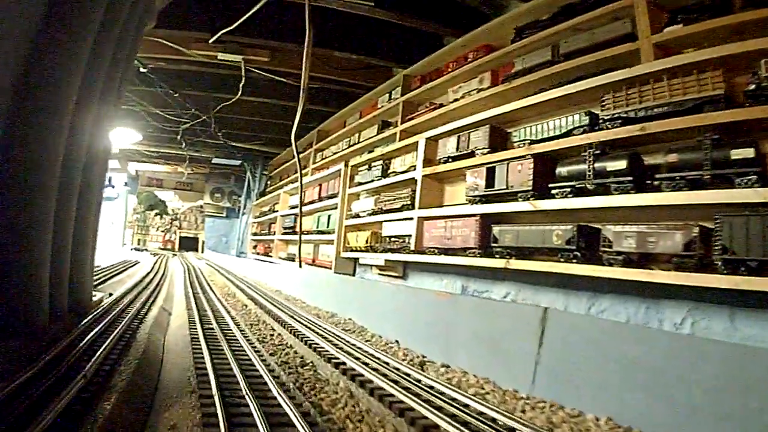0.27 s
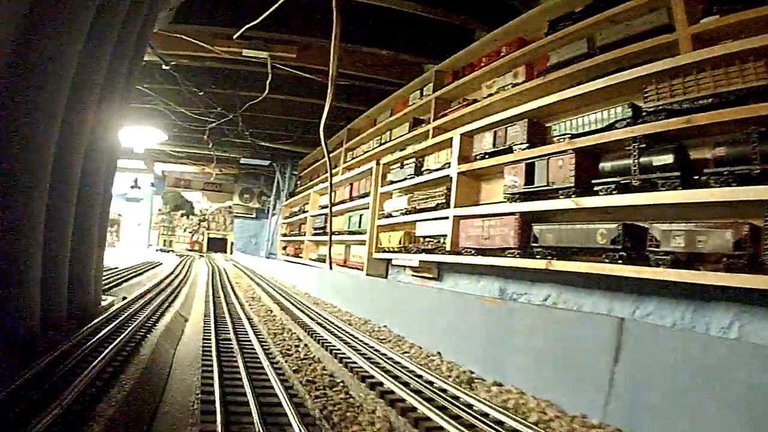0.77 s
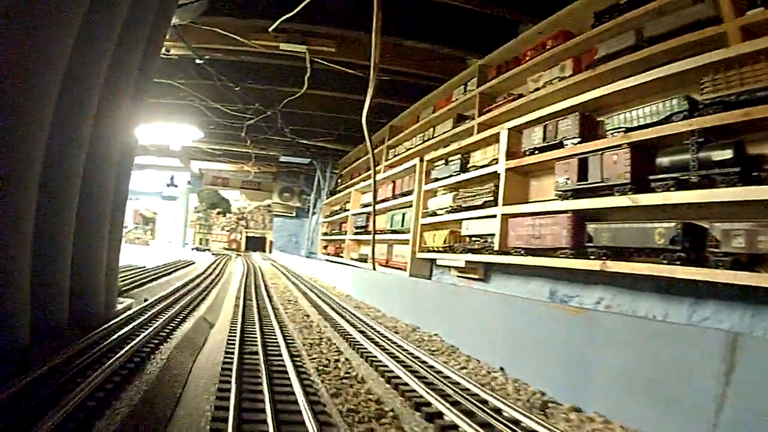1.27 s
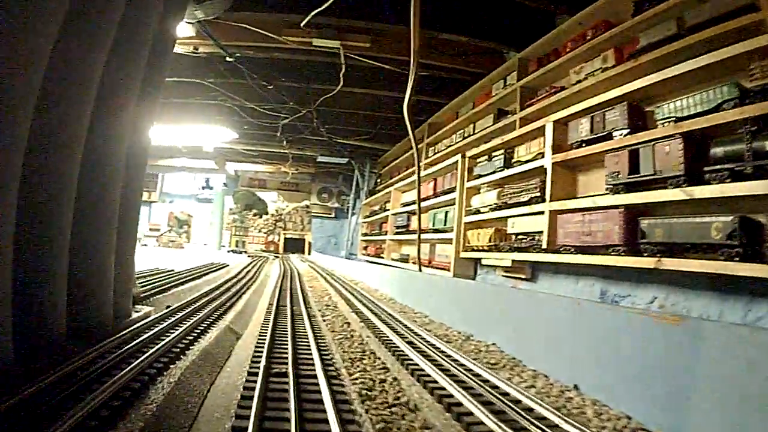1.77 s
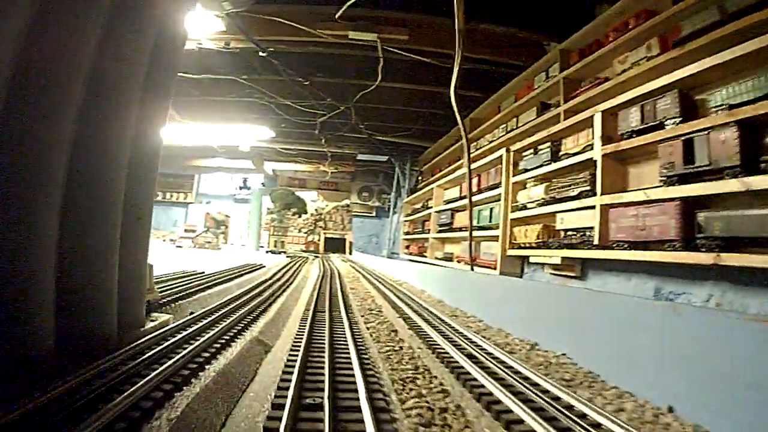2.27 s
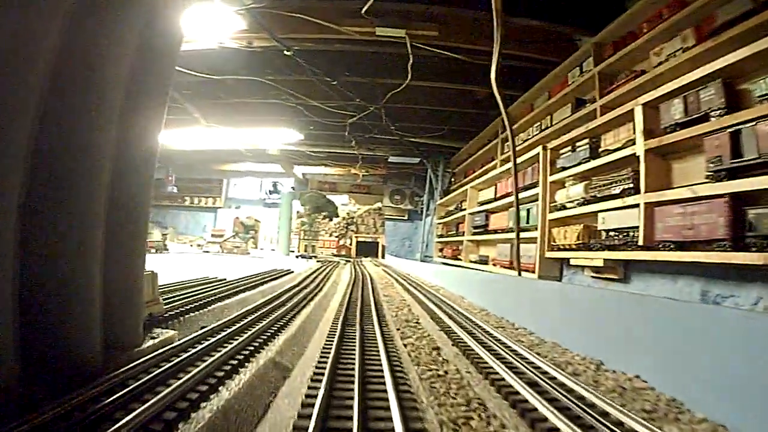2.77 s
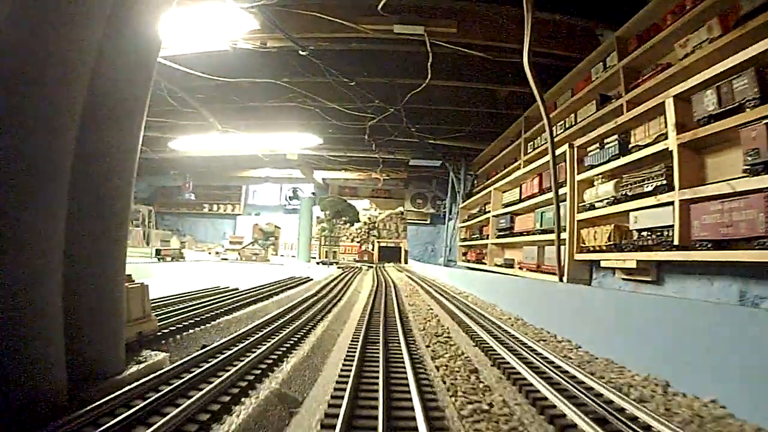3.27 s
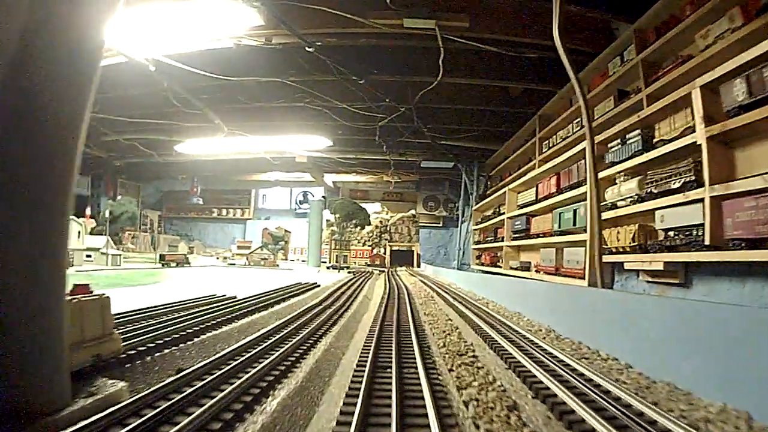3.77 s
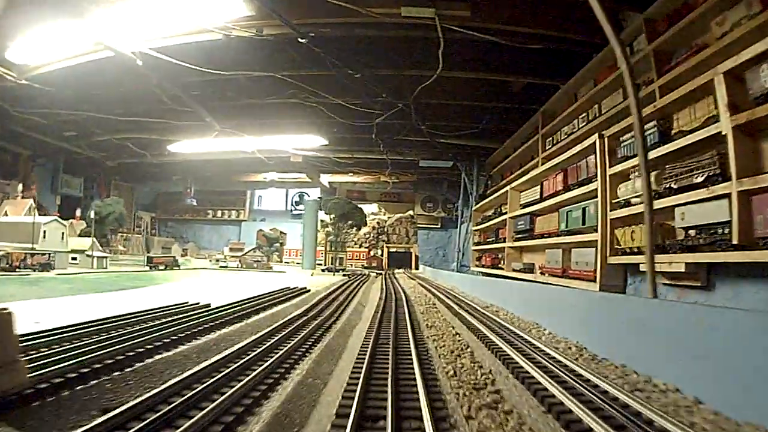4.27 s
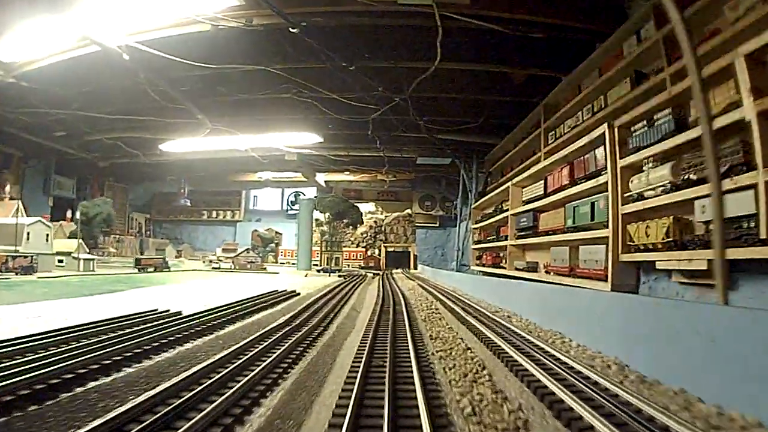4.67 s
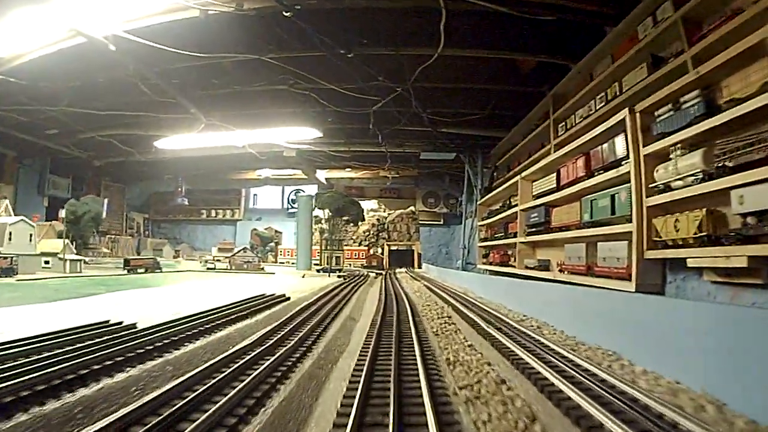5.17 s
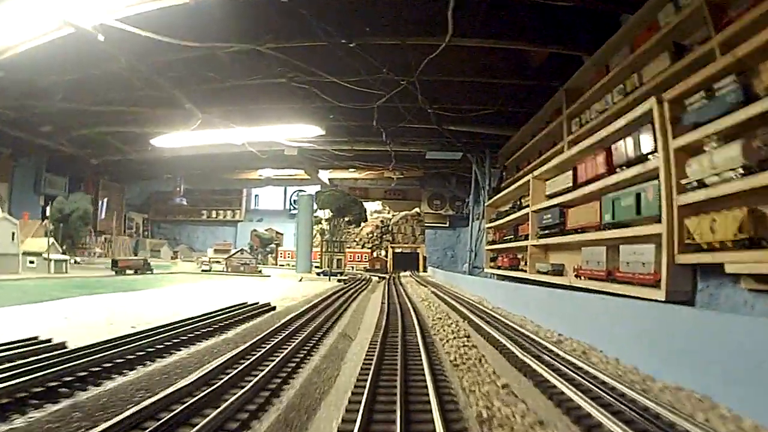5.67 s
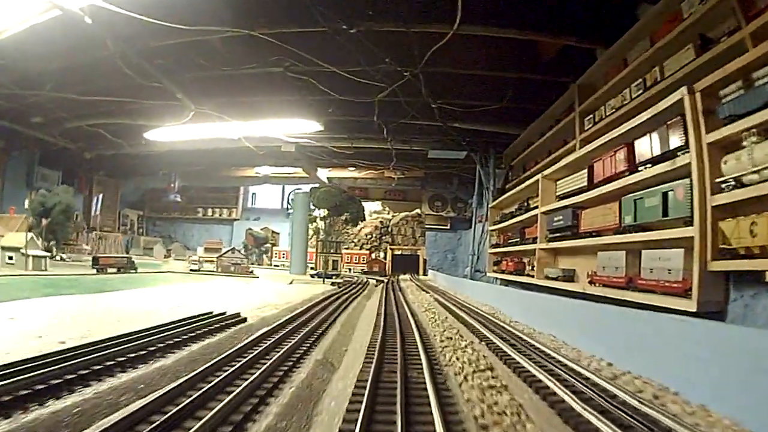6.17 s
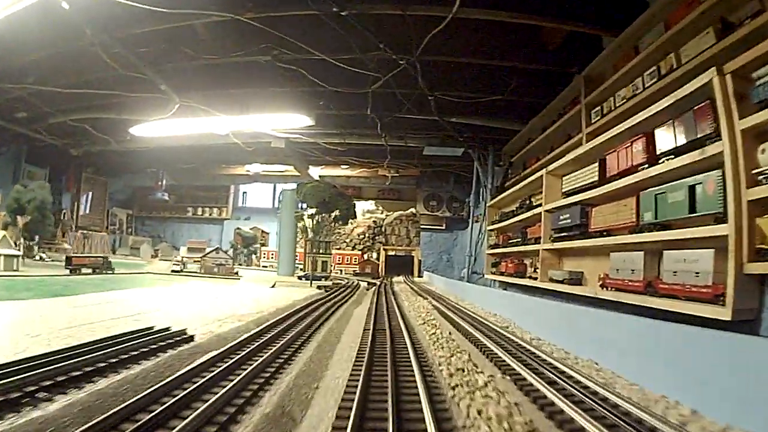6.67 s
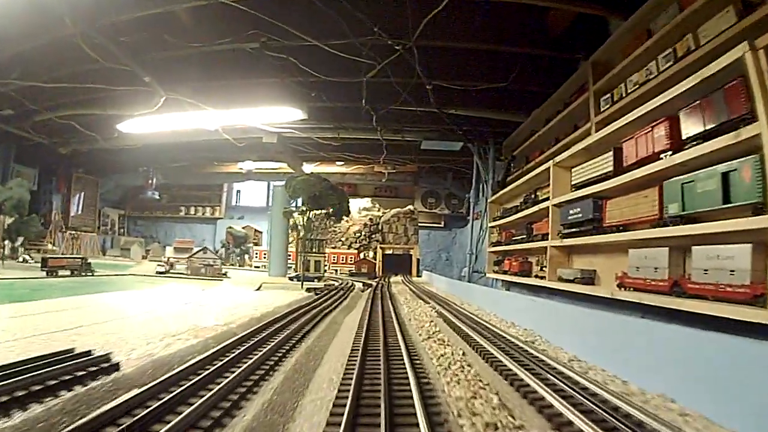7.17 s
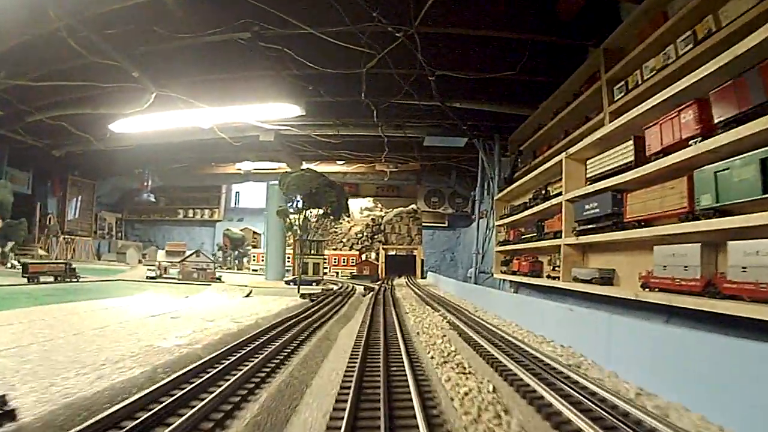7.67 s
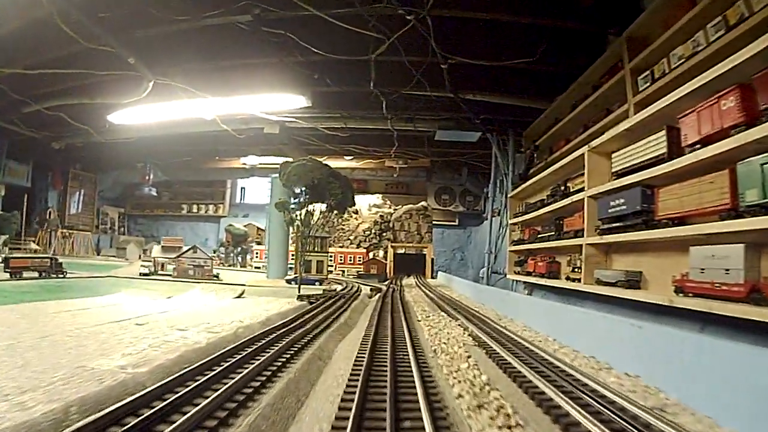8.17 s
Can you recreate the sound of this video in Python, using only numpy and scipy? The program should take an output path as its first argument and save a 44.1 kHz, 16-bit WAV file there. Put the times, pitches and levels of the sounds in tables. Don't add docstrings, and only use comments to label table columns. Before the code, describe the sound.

On-board sound of a small train on metal track: quiet humming and ticking at first, then harsh rumbling, ringing wheels and overloaded clacks.

```python
import sys
import numpy as np
from scipy import signal
from scipy.fft import rfft, irfft, next_fast_len
from scipy.io import wavfile
from scipy.ndimage import uniform_filter1d, map_coordinates

SR = 44100
rng = np.random.default_rng(int(sys.argv[2]) if len(sys.argv) > 2 else 0)


def put_to_file(sound):
    columns = np.atleast_2d(sound).T
    safe = np.clip(columns, -1, 1)
    whole_steps = np.round(safe * 32767)
    wavfile.write(sys.argv[1], SR, whole_steps.astype(np.int16))


def elevation(decibels):
    levels = np.asarray(decibels, float)
    return 10 ** (levels / 20)


N = 371322

# time [s], force_db [dB]
ROLLING_FORCE = [(0, -26.5), (1.1, -25.5), (1.9, -26), (2.4, -24.5), (2.6, -23), (3.2, -23.5), (3.6, -21),
                 (3.85, -18.5), (3.95, -17.5), (4.28, -13), (4.75, -13.5), (5.3, -12.5), (6.1, -11),
                 (6.4, -11.5), (6.9, -10.5), (7.3, -13.5), (7.9, -11), (8.42, -12)]
# time [s], pitch_hz [Hz], speed [0 to 1], boom_db [dB]
BODY_BOOM = [(0, 205, 0, -2), (1.2, 209.2, .1, -3.5), (1.9, 233.5, 0, -2.5), (2.5, 224.4, 0, -1),
             (2.85, 221.3, 0, 3.5), (3.1, 231, 0, -2), (3.7, 235.5, .5, 2), (4.0, 257.5, 0.9, 1),
             (5.0, 240.1, 1, -3.5), (6.3, 250.9, 1, -1), (7.2, 240, 1, -1.5), (8.42, 251.4, 0.8, -3)]
# pitch_hz [Hz], width_hz [Hz], level_db [dB]
WHEEL_TONES = [(1457, 64, -3), (1961, 140, -7), (2190, 60, -1.5), (2233, 130, -3), (2940, 110, -22.5)]


def rms_one(x):
    return x / np.sqrt(np.mean(x ** 2) + 1e-20)


def in_time(rows):
    times_s, *columns = np.transpose(rows)
    return [np.interp(np.arange(N) / SR, times_s, column) for column in columns]


def drift(rate_hz):
    r = np.exp(-2 * np.pi * rate_hz / SR)
    smooth = signal.lfilter([1], [1, -2 * r, r * r], rng.standard_normal(N + SR))
    return rms_one(smooth[SR:])


def resonance(x, hz, width_hz):
    r = np.exp(-np.pi * width_hz / SR)
    poles = [1, -2 * r * np.cos(2 * np.pi * hz / SR), r * r]
    return signal.lfilter([(1 - r * r) / 2, 0, (r * r - 1) / 2], poles, x)


def double_resonance(x, hz, width_hz):
    return resonance(resonance(x, hz, width_hz), hz, width_hz)


def coloured(x, spectrum, modes=()):
    size = next_fast_len(N)
    hz = np.arange(size // 2 + 1) * SR / size + 1
    corner_hz, corner_db = np.transpose(spectrum)
    power = elevation(np.interp(np.log(hz), np.log(corner_hz), corner_db, left=-120, right=-120)) ** 2
    for centre_hz, width_hz, db in modes:
        power += elevation(db) ** 2 / (1 + (2 * (hz - centre_hz) / width_hz) ** 2) ** 2
    return irfft(rfft(x, size) * np.sqrt(power), size)[:N]


def shaken(force, spectrum, modes):
    return rms_one(coloured(force, spectrum, modes))


def rolling():
    # pitch_hz [Hz], level_db [dB per Hz]
    board_response = [(30, -16.5), (42, -2), (70, 1.5), (120, -6), (170, -3.5), (260, -34.5)]
    body_response = [(110, -24.5), (170, -4.5), (310, -2), (460, -2.5), (540, -17), (800, -23.5)]
    rail_response = [(380, -19.5), (520, -2), (800, -2), (1000, -1), (1300, -3.5), (1500, -33)]
    wheel_response = [(1150, -44.5), (1330, -6.5), (1700, -10.5), (1900, -5.5), (2300, -5), (2420, -17),
                      (3000, -17), (3200, -21.5), (3800, -22.5), (6000, -15.5)]
    # pitch_hz [Hz], width_hz [Hz], level_db [dB]
    board_slow_tones = [(57, 54, 0.5), (119, 13, 1.5), (158, 23, -1.5)]
    board_fast_tones = [(93.8, 16, 5.5), (119, 14, -2.5)]
    body_tones = [(205, 18, -5), (382, 8.7, -7), (390.2, 28, 5), (443, 9.1, -4.5)]
    rail_tones = [(618.6, 7.1, 5.5), (1165, 89, -3)]

    force_db, = in_time(ROLLING_FORCE)
    speed = np.clip(in_time(BODY_BOOM)[1], 0, 1)
    knocks = rattle(per_s=32.0, spread_db=7.0, t60_s=0.051)
    chatter = np.sqrt(4.0 + (0.76 * knocks) ** 2)
    shared_db = 0.67 * drift(35.0)

    board = np.sqrt(speed) * shaken(roughness(0.42 * shared_db), board_response, board_fast_tones)
    board += np.sqrt(1 - speed) * shaken(roughness(0.3 * shared_db), board_response, board_slow_tones)
    body = shaken(roughness(0.47 * shared_db), body_response, body_tones)
    body += boom(width_hz=24)
    rail = shaken(roughness(shared_db) * chatter ** 0.41, rail_response, rail_tones)
    wheel_force = roughness(shared_db + 1.3 * drift(60.0)) * chatter
    wheels = shaken(wheel_force, wheel_response, WHEEL_TONES)

    out = answer(force_db, level_db=-22, share=0.71, sway_db=0.5) * board
    out += answer(force_db, level_db=-15.5, share=0.97, sway_db=1.5) * rms_one(body)
    out += answer(force_db, level_db=-18.5, share=1.095, sway_db=1) * rail
    out += answer(force_db, level_db=-13, share=1.362, sway_db=0.96) * wheels
    return out


def roughness(flicker_db):
    return elevation(flicker_db) * rng.standard_normal(N)


def rattle(per_s, spread_db, t60_s):
    strength = elevation(spread_db * np.minimum(rng.exponential(1, N), 2.5))
    knocks = (rng.random(N) < per_s / SR) * strength
    return signal.lfilter([1], [1, -elevation(-60 / (t60_s * SR))], knocks)


def boom(width_hz):
    hz, _, db = in_time(BODY_BOOM)
    phase = 2 * np.pi * np.cumsum(hz) / SR
    tone = drift(width_hz) * np.cos(phase) + drift(width_hz) * np.sin(phase)
    return elevation(db) * rms_one(tone)


def answer(force_db, level_db, share, sway_db):
    cruise_db, sway_hz = -12, 7.3
    return elevation(level_db + share * (force_db - cruise_db) + sway_db * drift(sway_hz))


def clicks():
    length = round(0.06 * SR)
    t = np.arange(length) / SR
    shape = (1 - np.exp(-t / 0.0006)) * elevation(-60 * t / 0.028)
    out = np.zeros(N + length)
    bursts = rng.standard_normal((150, length))
    for (start_s, db, hz, crack_db), noise in zip(all_clicks(), bursts):
        burst = noise * shape
        burst[round(0.0008 * SR)] += 6.0
        ring = resonance(burst, hz, 240)
        ring += elevation(-12) * double_resonance(burst, 1700, 1300)
        crack = double_resonance(burst, 3600.0, 1200.0)
        hit = ring / np.abs(ring).max()
        hit += elevation(crack_db - 7.0) * crack / np.abs(crack).max()
        out[round(start_s * SR):][:length] += elevation(db + 2.5) * hit
    return out[:N]


def all_clicks():
    # start_s [s], peak_db [dB], pitch_hz [Hz]
    joint_clicks = [(0.5949, -18, 1910), (0.7715, -16, 1940), (1.2081, -11.5, 2190), (1.5578, -10.5, 2050),
                    (1.725, -15, 1460), (1.7493, -11, 1925), (2.0367, -13, 1420), (2.2956, -15, 1450),
                    (2.4712, -10.5, 1185), (2.6193, -11.5, 1844), (2.7081, -12.5, 2150),
                    (2.9301, -14.5, 2200), (3.0439, -17, 1434), (3.3437, -15, 1186), (3.4165, -17.5, 2240),
                    (3.657, -16, 2160), (3.901, -4, 2010), (4.0636, -9.5, 2263), (4.2496, -4.5, 1610),
                    (4.4786, 1, 1217), (4.5175, -1, 1990), (4.9126, -2.5, 1490), (5.3392, 2, 2100),
                    (5.7467, -1, 1917), (5.9657, -6.5, 1460), (6.32, -6, 2000), (6.503, -4.5, 2050),
                    (6.6053, -3, 1420), (6.7909, -1, 2166), (7.1341, -3, 1557)]
    gap_s, over_force_db, spread_db = 0.11, 2, 0.5
    chance = rng.random((120, 3))
    start_s = np.cumsum(gap_s * (0.3 + 1.4 * chance[:, 0]))
    force_db = np.interp(start_s, *np.transpose(ROLLING_FORCE))
    db = force_db + over_force_db + spread_db * np.log(chance[:, 1])
    hz = np.array(WHEEL_TONES)[(4 * chance[:, 2]).astype(int), 0]
    knocks = np.transpose([start_s, db, hz])[start_s < N / SR]
    rows = np.vstack([joint_clicks, knocks])
    crack_db = -22.5 + 6 * rng.standard_normal(200)[:len(rows)]
    return np.column_stack([rows, crack_db])


def ticks():
    # start_s [s], peak_db [dB]
    pin_ticks = [(0.147, -47.5), (0.615, -37), (0.8175, -31), (0.9887, -40.5), (1.2073, -23), (1.3713, -34),
                 (1.4561, -34), (1.7491, -28), (1.8921, -31), (2.1126, -33.5), (2.2238, -26), (2.2518, -42),
                 (2.5005, -31.5), (2.7214, -31), (3.107, -24), (3.3846, -38), (3.9015, -21), (4.0637, -27),
                 (4.2338, -25.5), (5.2673, -26), (6.9855, -13), (7.392, -29)]
    t = np.arange(round(0.034 * SR)) / SR
    out = np.zeros(N + len(t))
    snaps = rng.standard_normal((len(pin_ticks), len(t)))
    for (start_s, db), noise in zip(pin_ticks, snaps):
        snap = double_resonance(noise * elevation(-60 * t / 0.011), 3100.0, 2200.0)
        out[round(start_s * SR):][:len(t)] += elevation(db + 5.0) * snap / np.abs(snap).max()
    return out[:N]


def scene():
    car = rolling() + clicks() + ticks()
    return np.array([car, car])


def jolted(x):
    reach = round(0.0015 * SR)
    hump = np.hanning(round(0.004 * SR))
    gain = np.ones(N)
    for start_s, db in all_jolts():
        start = round(start_s * SR) - reach // 2
        crest = start + np.argmax(np.abs(x[start:start + 2 * reach]))
        wanted = (1 + elevation(1.046 * db + 14.5)) / np.abs(x[crest])
        first = crest - len(hump) // 2
        span = slice(first, first + len(hump))
        tallest = np.abs(x[span] * (1 + (wanted - 1) * hump)).max()
        wanted *= wanted * np.abs(x[crest]) / tallest
        gain[span] = np.maximum(gain[span], 1 + (wanted - 1) * hump)
    return gain * x


def all_jolts():
    # start_s [s], crackle_db [dB]
    heavy_jolts = [(4.298, -28), (4.9193, -29), (5.3415, -19), (5.3455, -17.5), (5.4063, -30.5),
                   (5.546, -26), (5.748, -23.5), (5.7512, -26), (5.7978, -25.5), (5.9766, -24),
                   (6.0621, -31.5), (6.2149, -24), (6.217, -23), (6.3573, -18), (6.36, -19.5), (6.37, -21),
                   (6.3745, -24.5), (6.396, -22), (6.4079, -23.5), (6.5311, -20), (6.5553, -19.5),
                   (6.5823, -24.5), (6.617, -22.5), (6.6567, -26), (6.7486, -26.5), (6.776, -24.5),
                   (7.3385, -27.5), (8.0055, -25), (8.0513, -33), (8.3956, -28)]
    light_bumps = [(4.2604, -38), (4.4468, -44.5), (4.4787, -41.5), (4.5205, -38), (5.194, -48.5),
                   (5.511, -30), (5.526, -26.5), (5.5586, -28.5), (5.6387, -37), (5.6888, -32),
                   (5.769, -31.5), (5.8696, -44.5), (5.892, -49), (5.9321, -45), (5.9677, -29),
                   (6.1632, -33), (6.2586, -30), (6.3168, -39), (6.3463, -19.5), (6.794, -39),
                   (6.8237, -36.5), (6.8552, -39), (6.8989, -38), (6.9282, -34.5), (7.368, -29),
                   (7.5063, -44.5), (8.0393, -31), (8.1216, -46), (8.2233, -30.5), (8.2715, -32)]
    crest_gap_s, loss_db = 0.0036, 21.5
    chance = rng.random((len(heavy_jolts), 2, 2))
    steps = np.ceil(3 * chance[..., 0]) * [-1, 1]
    start_s, db = np.transpose(heavy_jolts)[..., None]
    around_s = start_s + crest_gap_s * steps
    around_db = db - loss_db * (0.5 + chance[..., 1])
    around = np.stack([around_s, around_db], -1)
    rows = np.vstack([heavy_jolts, light_bumps, *around])
    return rows[rows[:, 0] < N / SR - 0.005]


def filtered(x, design):
    return signal.sosfiltfilt(design, x)


def roll_off(x):
    return signal.sosfilt(signal.butter(12, 20000, fs=SR, output="sos"), x)


def record(dry):
    # pitch_hz [Hz], level_db [dB]
    band_limit = [(10, 0), (3800, 0), (3960, -7), (4140, -11), (4300, -16), (4480, -30), (4650, -46),
                  (4800, -75)]
    ceiling, knee, left_lag_s = 0.8, 0.8, 1 / 8000
    limited = dry[0] / (1 + (dry[0] / ceiling) ** 6) ** (1 / 6)
    x = coloured(limited, band_limit)

    shaved = np.clip(x, -knee, knee) - x
    grit = filtered(shaved, signal.butter(4, 5200, fs=SR, output="sos"))
    x = jolted(x + 0.4 * grit)
    late = map_coordinates(x, [np.arange(N) - left_lag_s * SR], order=3, mode="nearest")

    both = (late + x) / 2
    side = filtered((late - x) / 2, signal.butter(2, 110, "high", fs=SR, output="sos"))
    mid = filtered(both, signal.cheby2(16, 30, 3830, fs=SR, output="sos"))

    near_overload = uniform_filter1d(1. * (np.abs(x) > 0.83), size=350) > 1e-6
    kept = uniform_filter1d(1.6 * ((drift(6) > 1.1) | near_overload), size=512)
    mid += kept * filtered(both, signal.cheby2(16, 30, 4080, "high", fs=SR, output="sos"))
    return roll_off(np.clip(mid + side * [[1], [-1]], -1, 1))


dry = scene()
out = record(dry)
put_to_file(out)
```